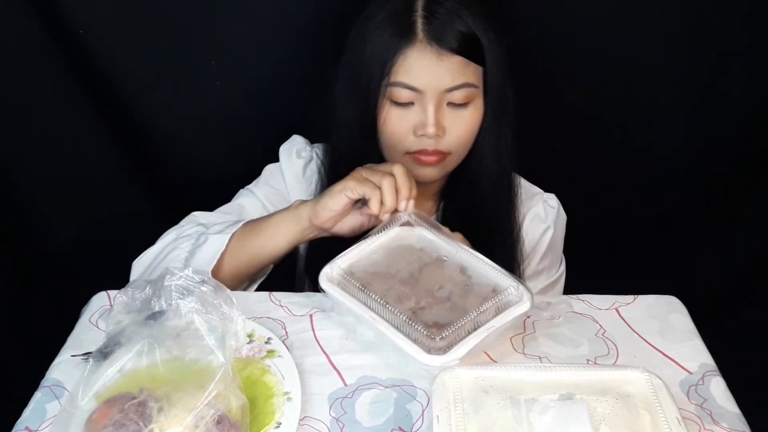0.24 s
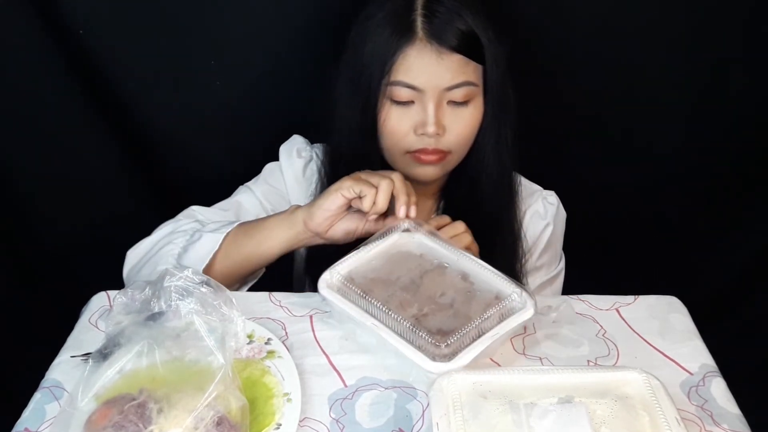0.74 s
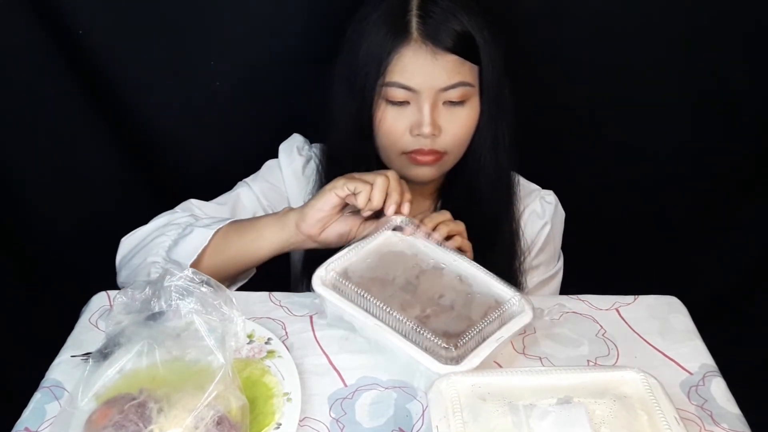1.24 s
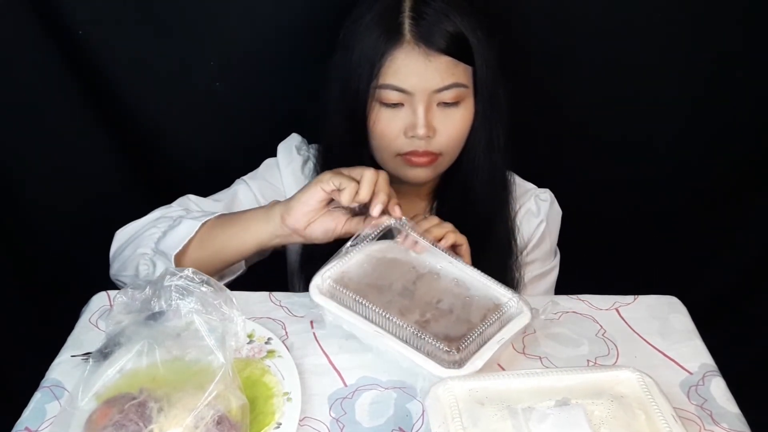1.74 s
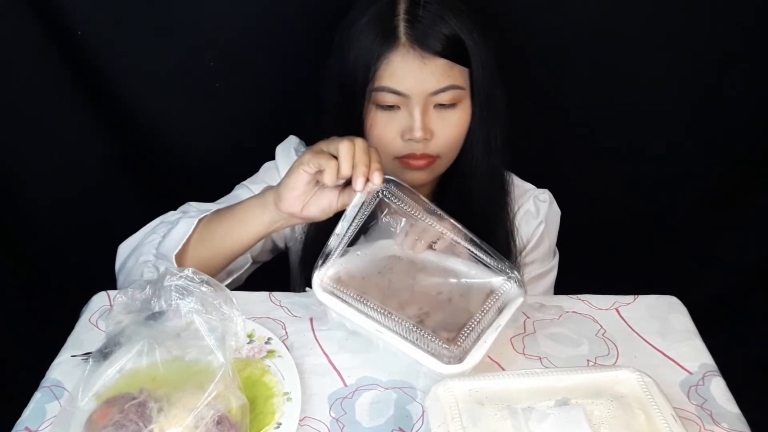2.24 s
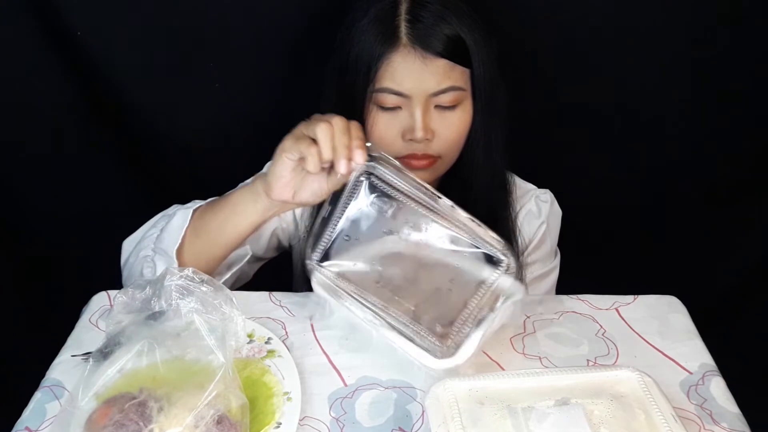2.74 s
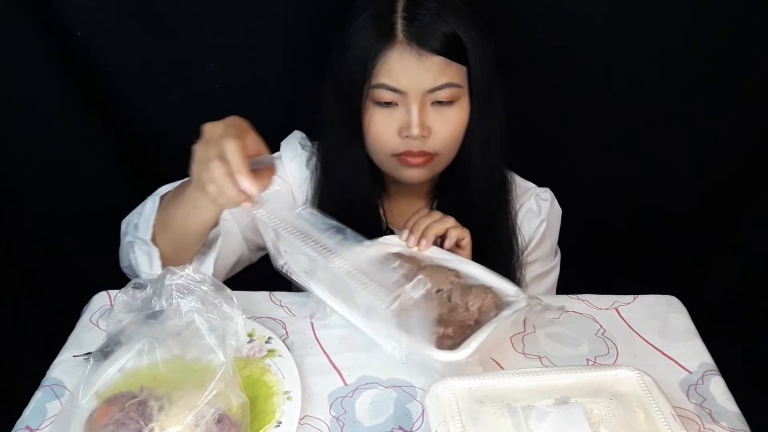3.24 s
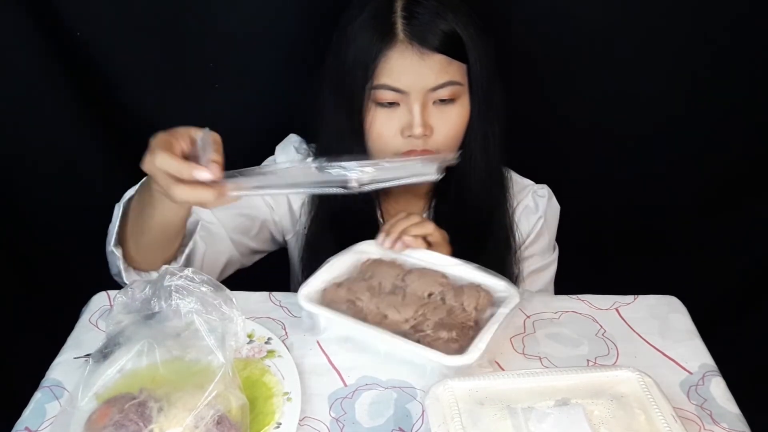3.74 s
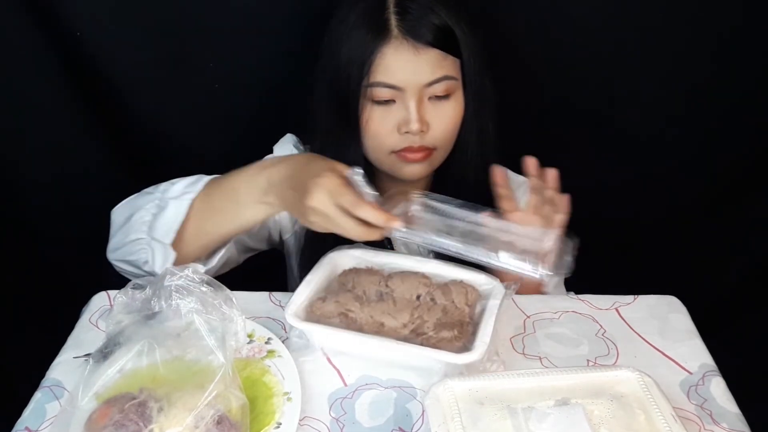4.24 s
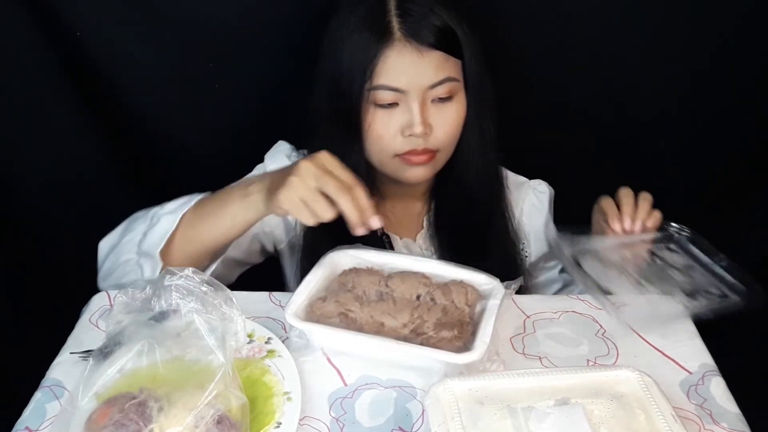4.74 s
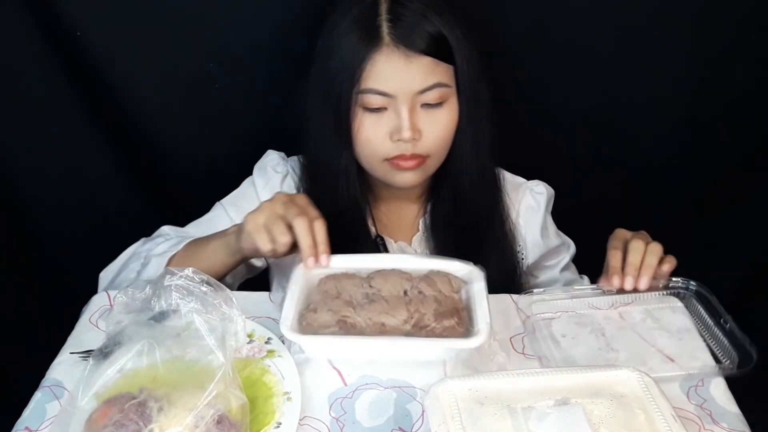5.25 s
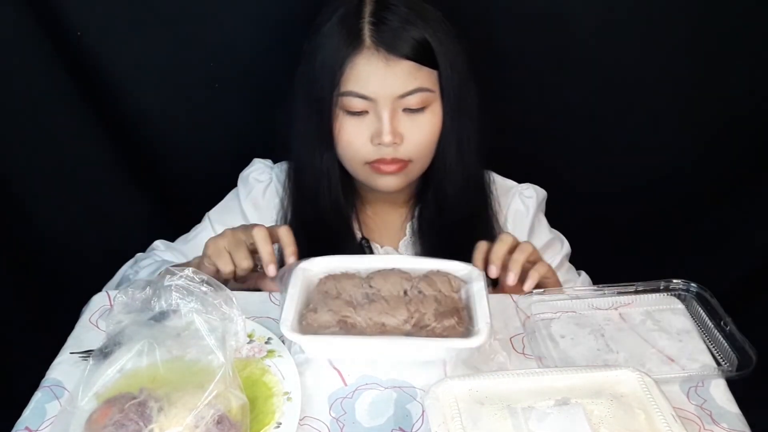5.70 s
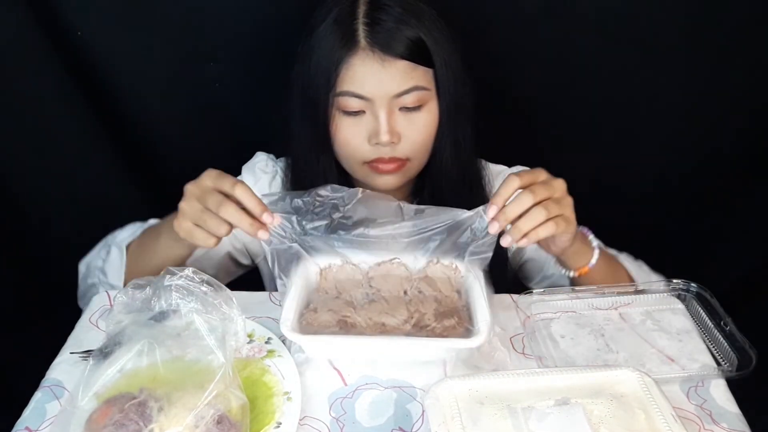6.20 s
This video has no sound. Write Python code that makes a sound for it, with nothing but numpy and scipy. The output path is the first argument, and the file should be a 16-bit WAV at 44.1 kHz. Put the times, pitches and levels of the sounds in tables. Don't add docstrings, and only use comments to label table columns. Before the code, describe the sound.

Close plastic snaps and hollow pops as fingers free a food tray lid, followed by soft ticks and a crisp rustle of peeling film.

```python
import sys
import numpy as np
from scipy import signal
from scipy.fft import rfft, irfft
from scipy.io import wavfile

SR = 44100
rng = np.random.default_rng(int(sys.argv[2]) if len(sys.argv) > 2 else 0)


def to_wav(s):
    ch = np.atleast_2d(s).T
    pcm = np.round(np.clip(ch, -1, 1) * 32767)
    wavfile.write(sys.argv[1], SR, pcm.astype(np.int16))


def nominal_scale(level):
    x = np.asarray(level, float) / 20
    return 10 ** x


N = 285327

# (time [s], crack peak [dB], panel pitch [Hz], panel thump re crack [dB], room feed [dB])
RIM_POPS = [(0.0119, -24.5, 1150, -20, 17.5), (0.0753, -24.5, 816, 8.5, -4),
            (0.0961, -16.5, 980, -1.5, 8.5), (0.2073, -23, 1200, -11, 11.5), (0.295, 0, 864, 1, 1),
            (1.4146, -28.5, 1250, 10.5, 7.5), (1.4811, -4, 1050, 6, 3.5), (1.8315, -25.5, 1550, -1.5, 3),
            (1.9214, -4, 1010, 0.5, 2.5), (1.9544, -13.5, 825, -10, 12), (1.9831, 0, 950, 14, 3.5),
            (2.274, -20.5, 1080, -21.5, 11), (2.386, -36, 1450, -7.5, 21.5), (2.4266, 1, 1260, -3, 2),
            (2.603, -13, 1020, -2.5, 4), (2.7111, -6, 820, 2.5, 7.5), (2.832, 4.5, 857, 2, 7),
            (3.1342, 6, 1240, -5, 2.5), (4.2267, -57, 905, 20, -3), (4.7935, -61.5, 522, 18.5, 10.5)]


def rms_one(x):
    return x / np.sqrt(np.mean(x ** 2) + 1e-20)


def peak_one(x):
    return x / np.max(np.abs(x), axis=-1, keepdims=True)


def at_hz(points, hz):
    table_hz, values = np.array(points)[:, :2].T
    return np.interp(np.log(hz), np.log(table_hz), values)


def band(x, low_hz, high_hz):
    edges_hz = [low_hz, min(high_hz, 0.47 * SR)]
    return signal.sosfilt(signal.butter(2, edges_hz, "band", fs=SR, output="sos"), x)


def resonate(x, hz, width_hz):
    r = np.exp(-np.pi * width_hz / SR)
    feedback = [1, -2 * r * np.cos(2 * np.pi * hz / SR), r * r]
    return signal.lfilter([(1 - r * r) / 2, 0, (r * r - 1) / 2], feedback, x)


def coloured(x, spectrum):
    hz = np.fft.rfftfreq(8192, 1 / SR) + 1
    cepstrum = irfft(np.log(nominal_scale(at_hz(spectrum, hz))))
    cepstrum[1:4096] *= 2
    cepstrum[4097:] = 0
    return signal.fftconvolve(x, irfft(np.exp(rfft(cepstrum))))[:N]


def place(times, sounds):
    out = np.zeros(N + len(sounds[0]))
    for s, sound in zip(times, sounds):
        start = round(s * SR)
        out[start:start + len(sound)] += sound
    return out[:N]


def pops():
    # (time [s], crack peak [dB], panel pitch [Hz], panel thump re crack [dB], room feed [dB])
    rebound_rows = [
        (1.5145, -6, 849, 6.5, 3),
        (1.556, -12, 823, -1, 6),
        (1.991, -10, 887, -9, 0.5),
        (2.0113, -7, 946, 14.5, -1),
        (2.0312, -10.5, 942, 5.5, -7.5),
        (2.05, -18, 1490, 13, 6),
        (2.845, -14.5, 937, -24.5, 19),
    ]
    # (frequency [Hz], width [Hz], level [dB])
    panel_modes = [(794, 34, 6.5), (937, 14, -9.5), (1240, 33, 13), (1537, 95, 17), (1775, 74, 2),
                   (2280, 43, 2), (2574, 180, -11)]
    pop_treble_db, rebound_treble_db = -5.5, -25
    panel_db, body_db, rattle_db, rattle_decay_s = -11.0, -0.5, -4.0, 0.9 * 0.0016

    rows = [(*p, pop_treble_db) for p in RIM_POPS] + [(*p, rebound_treble_db) for p in rebound_rows]
    t = np.arange(2600) / SR
    noises = rng.standard_normal((len(rows), 2600))
    near, far = [], []
    for (s, db, hz, thump_db, room_db, treble_db), noise in zip(rows, noises):
        impulse = t == 0
        both = np.array([impulse + nominal_scale(rattle_db) * noise * np.exp(-t / rattle_decay_s), impulse])
        crack = peak_one(band(both, 1100, 5700))
        crack = crack + nominal_scale(treble_db) * peak_one(band(both, 3500, 14000))
        modes = 0
        for k, (mode_hz, width_hz, mode_db) in enumerate(panel_modes):
            modes = modes + nominal_scale(mode_db) * resonate(both, mode_hz, 0.82 * width_hz) * (-1) ** k
        thump = peak_one(resonate(both, hz, hz / 3.5))
        thump = thump + nominal_scale(body_db) * peak_one(band(both, 830, 3100))
        thump = thump + nominal_scale(panel_db) * peak_one(modes)
        sound = nominal_scale(db) * (crack + nominal_scale(thump_db - 1.5) * thump)
        near.append(sound[0])
        far.append(nominal_scale(room_db) * sound[1])
    starts = np.array(rows)[:, 0] - 0.0006
    return place(starts, near), place(starts, far)


def ticks(crinkle_db):
    # (time [s], peak [dB], pitch [Hz])
    pry_rows = [(0.0144, -19, 6500), (0.0672, -11.5, 3140), (0.2049, -11, 3500), (0.4399, -30, 3440),
                (0.4539, -16, 3480), (0.633, -23.5, 6700), (0.6764, -32, 7460), (0.6839, -17, 6670),
                (0.7771, -16.5, 6300), (0.8834, -23, 2420), (0.9887, -22.5, 2270), (1.014, -28, 3480),
                (1.0241, -19, 3360), (1.1443, -25, 3100), (1.2915, -26.5, 2730), (1.4346, -25.5, 3570),
                (1.4411, -13.5, 2520), (1.512, -5.5, 2010), (1.6397, -23.5, 7100), (1.6871, -19, 6850),
                (1.7599, -20.5, 4070), (1.8911, -18.5, 3250), (2.2318, -38, 2300), (2.2408, -33.5, 6890),
                (2.3994, -15.5, 7370), (2.6953, -22.5, 6290), (2.7077, -20, 2000), (2.7097, -6.5, 2286),
                (3.0784, -10.5, 3530), (3.1037, -22, 3400)]
    # (time [s], peak [dB], pitch [Hz])
    carry_rows = [(3.2844, -26, 1980), (3.3474, -33.5, 2310), (3.3676, -27, 2500), (3.4132, -32.5, 6590),
                  (3.4316, -25, 7000), (3.4491, -26.5, 6640), (3.474, -29, 6980), (3.5204, -18, 5360),
                  (3.5408, -22, 2980), (3.677, -18.5, 7000), (3.7773, -20.5, 6700), (3.9, -22.5, 6400),
                  (3.9275, -20.5, 6060), (3.5768, -25, 7070), (3.6366, -25, 7300), (3.65, -20, 3430),
                  (3.8262, -25, 4330), (4.0752, -33.5, 2660), (4.089, -39, 2920), (4.13, -45, 6500),
                  (4.3619, -28, 2750), (4.5236, -33.5, 3150), (4.669, -40, 3000), (4.9215, -33.5, 2940),
                  (4.9258, -21.5, 2900), (5.027, -15, 7660), (5.0634, -16.5, 6740), (5.2817, -17.5, 2430),
                  (5.3797, -27, 4750)]
    # (time [s], peak [dB], pitch [Hz])
    film_rows = [(5.5312, -32, 3860), (5.6108, -32.5, 2720), (5.6546, -35.5, 7200), (5.689, -19, 3730),
                 (5.7329, -19, 2400), (5.7722, -20.5, 2600), (5.7872, -11, 2530), (5.836, -25, 6900),
                 (5.8425, -11, 6200), (5.8449, -15, 2620), (5.8967, -17, 6900), (5.9867, -10.5, 7100),
                 (6.0456, -14.5, 2490), (5.9529, -16, 3480), (6.0282, -12, 3820), (6.081, -16, 6360),
                 (6.109, -16.5, 3060), (6.1768, -18.5, 7040), (6.2147, -19, 6700), (6.4288, -43, 2300),
                 (6.1404, -14, 6540), (6.1947, -14.5, 3600), (6.2566, -18, 3020), (6.3478, -21.5, 6300),
                 (6.3859, -23, 7000), (6.4103, -21, 2550), (6.4441, -12.5, 3420), (6.4512, -19, 4050)]
    ring_db, treble_db, trim_db, room_db = -6.5, -15 + 14, -0.5, 5.0

    rows = pry_rows + carry_rows + film_rows + stray_ticks(crinkle_db)
    t = np.arange(900) / SR
    noises = rng.standard_normal((len(rows), 900))
    near, far = [], []
    rattle = t * np.exp(-t / 7e-4)
    for (s, db, hz), noise in zip(rows, noises):
        both = np.array([noise * rattle, t == 0])
        click = peak_one(band(both, 1700, 8000)) + nominal_scale(ring_db) * peak_one(resonate(both, hz, hz / 5))
        click = click + nominal_scale(treble_db) * peak_one(band(both, 8000, 16000))
        sound = nominal_scale(db + trim_db) * peak_one(click)
        near.append(sound[0])
        far.append(nominal_scale(room_db) * sound[1])
    starts = np.array(rows)[:, 0] - 0.0006
    return place(starts, near), place(starts, far)


def stray_ticks(crinkle_db):
    count, low_hz, octaves = 120, 2300, 2.2
    over_crinkle_db, spread_db = 14, 4.0
    when, size, pitch = rng.random((count, 3)).T
    s = (np.arange(count) + when) / count * (N - 1) / SR + 0.001
    grip_db = crinkle_db[((s - 0.001) * SR).astype(int)]
    db = grip_db + over_crinkle_db + spread_db * (2 * size - 1)
    return list(zip(s, db, low_hz * 2 ** (octaves * pitch)))


def handling(crinkle_db, rub_db):
    # (frequency [Hz], density [dB per Hz])
    crinkle_colour = [(300, -14.5), (700, -1), (1500, -5.5), (2600, 1), (4500, 0.5), (7000, -6),
                      (11000, -9), (16000, -11)]
    grains_per_s, size_spread_db, clump_db, treble_db = 5000, -0.9, 4.0, -0.5

    clumps = rms_one(band(rng.standard_normal(N), 32, 170)).clip(-2.5, 1.8)
    sizes = nominal_scale(size_spread_db * np.minimum(rng.exponential(1, N), 4)) * rng.choice([-1, 1], N)
    flips = rng.random(N) < grains_per_s / SR
    grains = rms_one(coloured(sizes * flips * nominal_scale(clump_db * clumps), crinkle_colour))
    grains = grains + (nominal_scale(treble_db) - 1) * band(grains, 8000, 19000)
    rub = rms_one(band(rng.standard_normal(N) * nominal_scale(7.5 * clumps), 380, 1800))
    return nominal_scale(crinkle_db - 2.5) * grains + nominal_scale(rub_db - 3.0) * rub


def effort():
    # (start [s], length [s], crinkle at start [dB], crinkle at end [dB], rub re crinkle [dB])
    lid_grips = [(0.0, 0.04, -38, -31.5, -4), (0.19, 0.22, -35, -47, -9), (0.442, 0.19, -34, -55, -5.5),
                 (0.61, 0.08, -39.5, -31.5, -9.5), (0.739, 0.067, -45, -37.5, -1),
                 (0.874, 0.32, -42, -37.5, -6.5), (1.262, 0.086, -49, -46.5, 1), (1.405, 0.11, -47, -26, 0),
                 (1.583, 0.97, -44, -45.5, -4), (2.35, 0.33, -54, -50, -6), (2.673, 0.41, -44.5, -35, -4.5),
                 (3.144, .12, -24.5, -51, 8), (3.357, 0.11, -61, -42, -12), (3.517, .02, -41, -44, -4),
                 (3.565, 0.37, -41, -31.5, -15.5), (4.042, 0.066, -72, -57, -2),
                 (4.229, 0.019, -62.5, -71, 21), (4.362, 0.016, -60, -61, 4), (4.486, 0.058, -55, -59, 3),
                 (4.618, .14, -73.5, -72, 6), (4.78, 0.086, -76, -76, 11), (4.928, 0.15, -37, -30, -21.5),
                 (5.105, .2, -37.5, -37.5, -10)]
    # (start [s], length [s], crinkle at start [dB], crinkle at end [dB], rub re crinkle [dB])
    film_grips = [
        (5.526, 0.084, -64.5, -64, 3),
        (5.656, 0.039, -36.5, -36, -10),
        (5.696, 0.31, -29, -36, -10.5),
        (5.968, 0.3, -35, -38, -6),
        (6.347, 0.18, -58, -47, 8),
    ]
    attack_db_per_s, release_db_per_s = 1496.5, 254

    t = np.arange(0, N + 64, 64) / SR
    s, length, first_db, last_db, rub_db = np.array(lid_grips + film_grips).T[:, :, None]
    db = first_db + (last_db - first_db) * np.clip((t - s) / length, 0, 1)
    db = db - attack_db_per_s * np.maximum(s - t, 0)
    db = db - release_db_per_s * np.maximum(t - s - length, 0)
    both = [10 * np.log10(np.sum(nominal_scale(2 * v), axis=0) + 1e-10) for v in (db, db + rub_db)]
    return [np.interp(np.arange(N) / SR, t, v) for v in both]


def hollow(pop, thud):
    # (frequency [Hz], width [Hz], level for pops [dB], level for thuds [dB])
    hollow_modes = [(405.3, 18, 2.5, 11.5), (772.6, 23, 5, 5), (927, 13, 7.5, 3.5), (1570, 16, 5, 4.5)]
    ringing = 0
    for hz, width_hz, pop_db, thud_db in hollow_modes:
        ringing = ringing + resonate(nominal_scale(pop_db) * pop + nominal_scale(thud_db) * thud, hz, width_hz)
    return ringing


def thuds():
    # (time [s], peak [dB], pitch [Hz], knock re thud [dB])
    thud_rows = [(0.011, -33, 176, -3), (1.227, -44, 101, -9), (1.474, -22.5, 228, -4),
                 (1.51, -17, 300, -12), (1.911, -19, 300.7, -24), (1.982, -8, 310, -12),
                 (2.424, -16.5, 290, 11), (2.602, -36, 157.8, -11), (2.709, -10, 346, 10),
                 (2.832, -18, 132, -8), (3.131, -24, 230, -6), (3.511, -47, 116, -8), (4.7945, -35, 492, 3),
                 (4.815, -39, 169, 18), (4.848, -40, 180, 6), (4.826, -39, 300, 17),
                 (5.698, -48, 141, -3.5), (5.791, -41, 207, 2)]
    cycles, trim_db, knock_hz, knock_width_hz = 3.0, -6.5, 410, 170

    push = signal.lfilter([1], [1, -0.9], np.arange(4000) == 0)
    sounds = []
    for s, db, hz, knock_db in thud_rows:
        knock = nominal_scale(knock_db - 17.5) * peak_one(resonate(push, knock_hz, knock_width_hz))
        sounds.append(nominal_scale(db + trim_db) * (peak_one(resonate(push, hz, hz / cycles)) + knock))
    times, pop_times = np.array(thud_rows)[:, 0], np.array(RIM_POPS)[:, 0]
    nearest = pop_times[np.abs(times[:, None] - pop_times).argmin(axis=1)]
    return place(np.where(np.abs(nearest - times) < 0.02, nearest, times), sounds)


def room(x):
    # (frequency [Hz], T60 [s])
    decay_times = [(100, 0.27), (260, 0.32), (700, 0.3), (1400, 0.33), (2200, 0.26), (4850, 0.28),
                   (12800, 0.29)]
    # (frequency [Hz], level [dB])
    wall_colour = [(60, -7.5), (150, 11), (400, 1.5), (1000, -2), (1500, 5.5), (2500, 2.5), (6000, 0.5),
                   (15000, 5.5)]
    gap_s, build_s = 0.00073, 0.0014
    edges_hz = 30 * 2 ** np.arange(0, 9.6, 0.5)

    t = np.arange(SR // 2) / SR
    white = rng.standard_normal((2, 5, len(t)))
    tails = 0
    for k, (low_hz, high_hz) in enumerate(zip(edges_hz, edges_hz[1:])):
        hz = np.sqrt(low_hz * high_hz)
        decay_db = at_hz(wall_colour, hz) - 60 * t / at_hz(decay_times, hz)
        tails = tails + nominal_scale(decay_db) * band(white[k % 2], low_hz, high_hz)
    tails = tails * (1 - np.exp(-np.maximum(t - gap_s, 0) / build_s))
    tails = tails / np.sqrt(np.sum(tails ** 2, axis=1, keepdims=True))
    spot = np.arange(N) // 3000 % 5
    by_spot = x * (spot == np.arange(5)[:, None])
    return signal.fftconvolve(by_spot, tails, axes=1)[:, :N].sum(axis=0)


def scene():
    crinkle_db, rub_db = effort()
    pop, pop_far = pops()
    tick, tick_far = ticks(crinkle_db)
    crinkle = handling(crinkle_db, rub_db)
    thud = thuds()
    direct = pop + hollow(pop_far, thud) + tick + crinkle + thud
    to_walls = pop_far + tick_far + nominal_scale(-1.0) * crinkle + nominal_scale(-0.5) * thud
    return (direct + room(to_walls))[None]


def band_limit(x):
    return signal.sosfilt(signal.butter(12, 16670, fs=SR, output="sos"), x)


def record(dry):
    # (frequency [Hz], level [dB])
    capsule_colour = [(20, -10.5), (70, 11.5), (200, 4.5), (4800, -3), (6000, -0.5), (7100, 6.5),
                      (7600, 1.5), (8100, -4), (10000, -2), (13500, -4), (16000, -6)]
    # (frequency [Hz], level [dB])
    hush_colour = [(18, -23.5), (30, -20), (48, -20), (106, -4), (203, -3), (523, -12), (931, -15),
                   (2040, -20), (2210, -22.5), (3110, -20), (8200, -34), (14600, -26.5), (15800, -43)]
    hush_db, top_cut_hz = -54, 15900

    hush = nominal_scale(hush_db) * rms_one(coloured(rng.standard_normal(N), hush_colour[:-1]))
    x = coloured(dry[0], capsule_colour) + hush
    x = np.clip(x[None] - 0.002, -1, 1)
    x = signal.sosfilt(signal.ellip(8, 0.5, 32, top_cut_hz, fs=SR, output="sos"), x)
    return band_limit(x)


dry = scene()
out = record(dry)
to_wav(out)
```